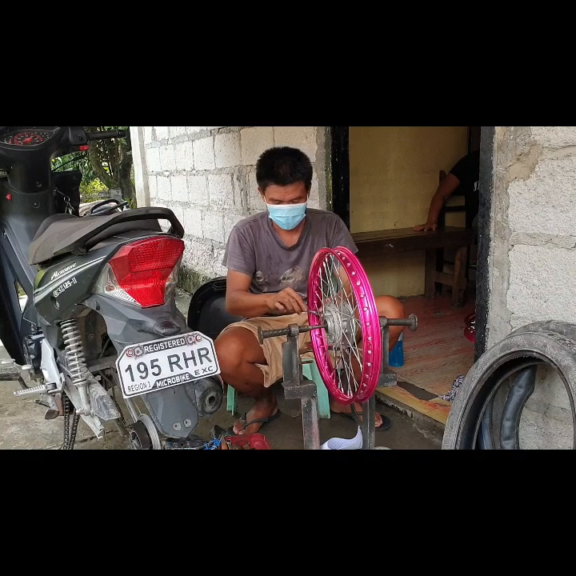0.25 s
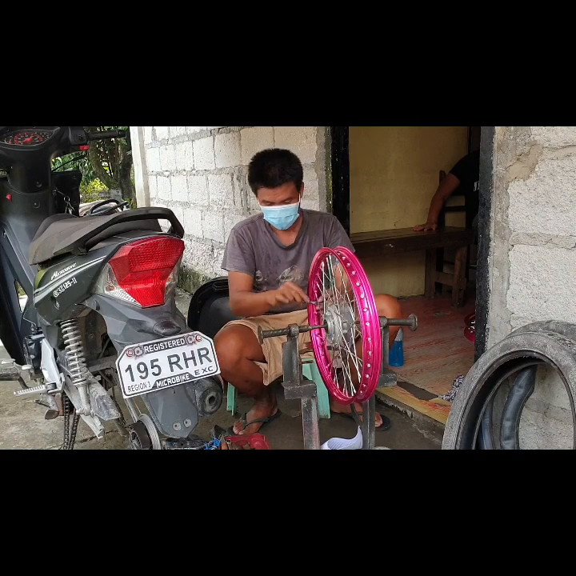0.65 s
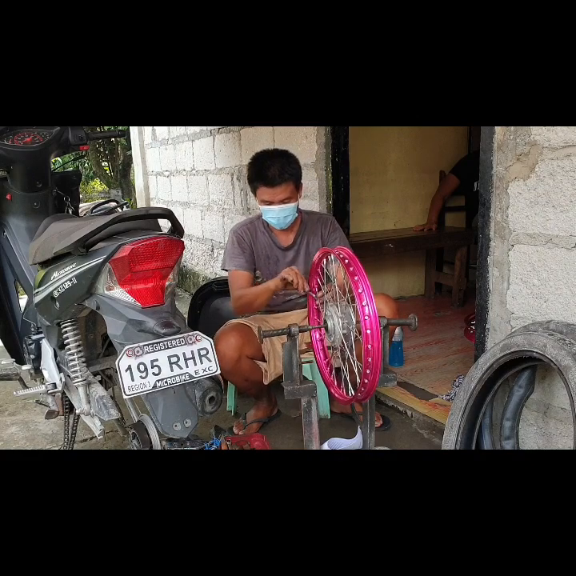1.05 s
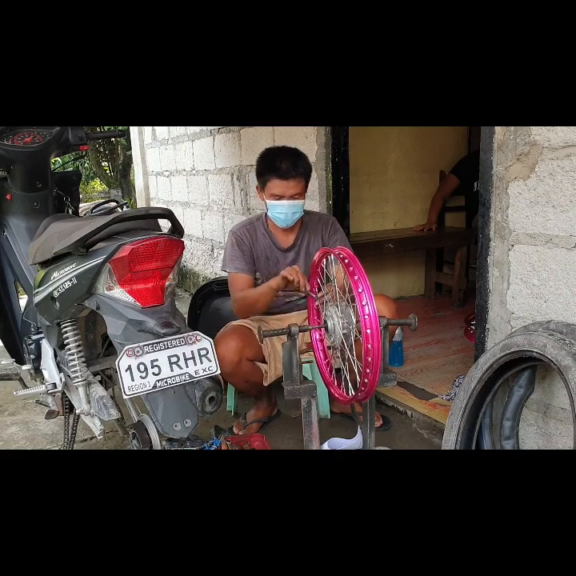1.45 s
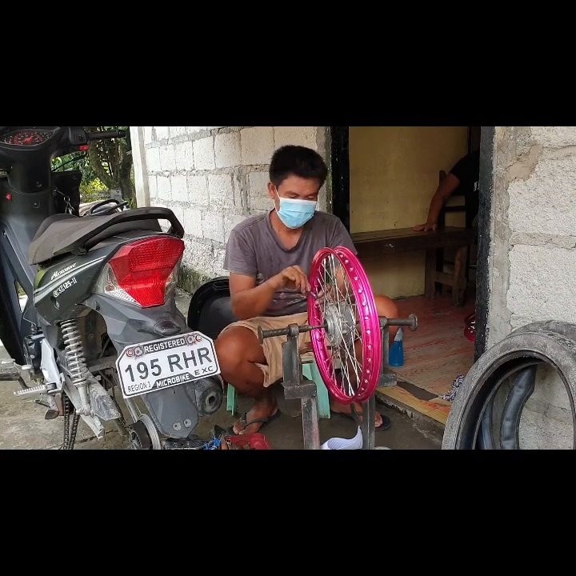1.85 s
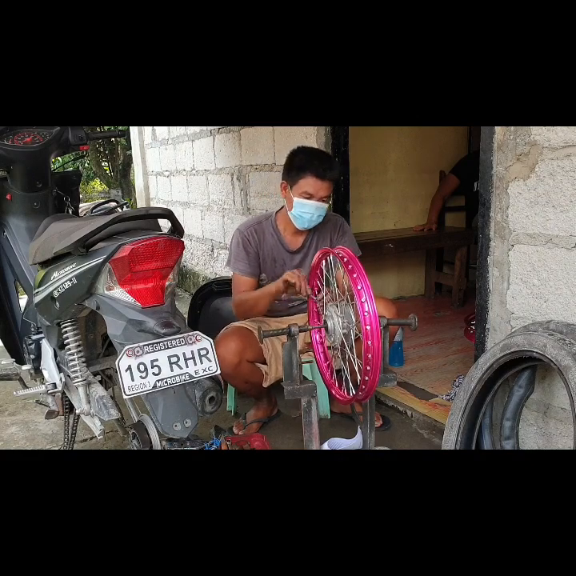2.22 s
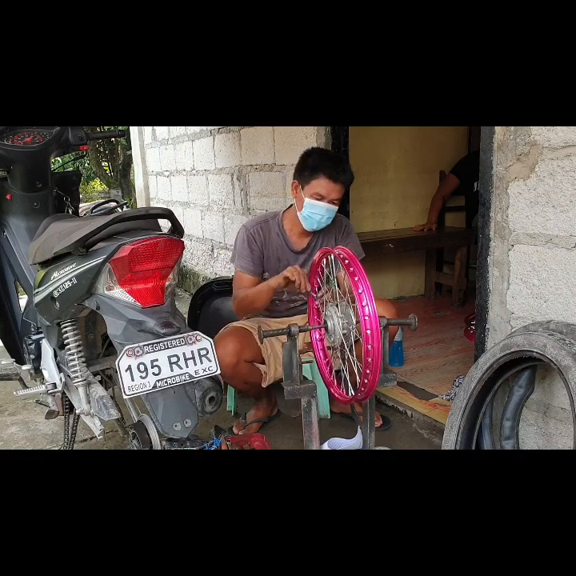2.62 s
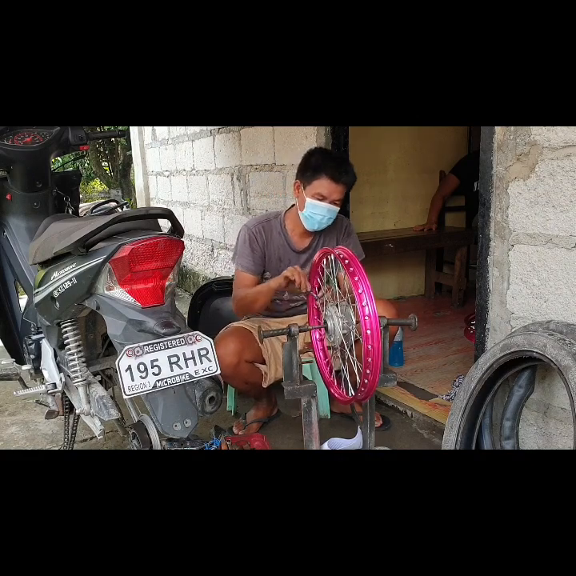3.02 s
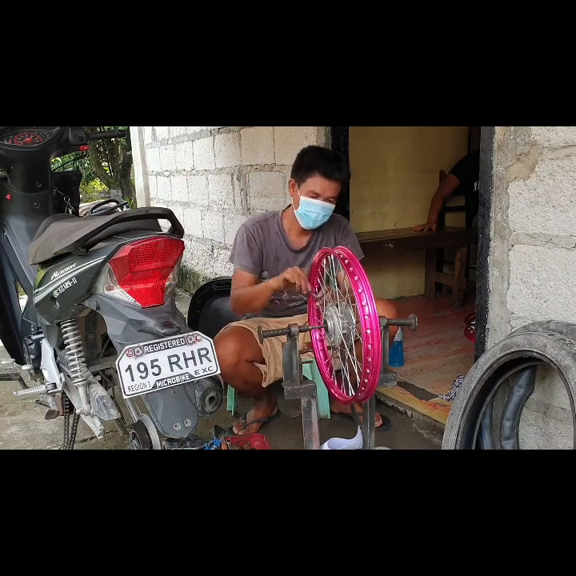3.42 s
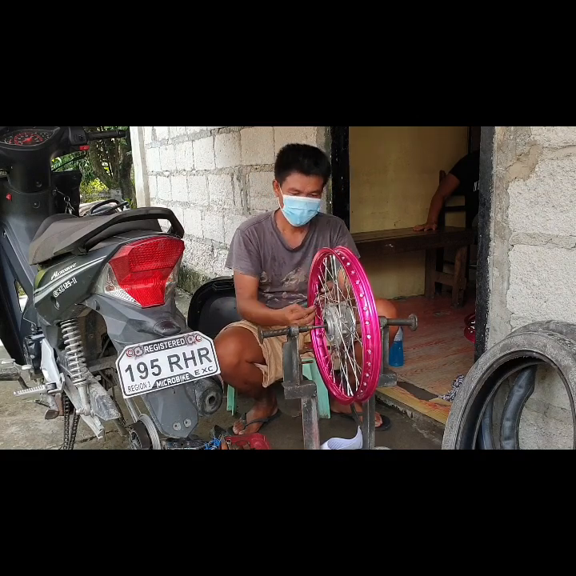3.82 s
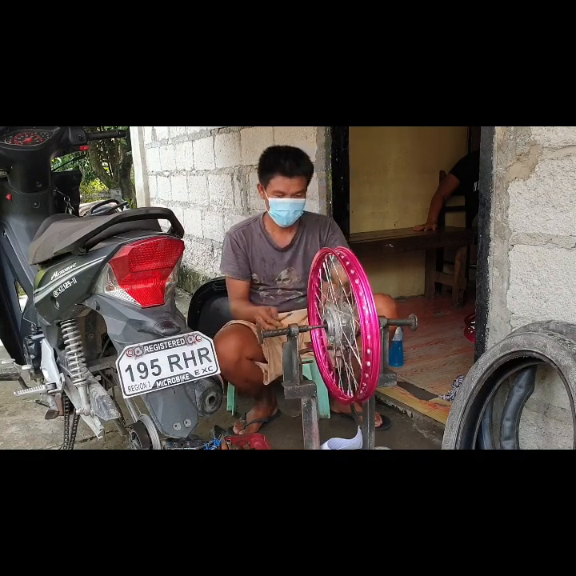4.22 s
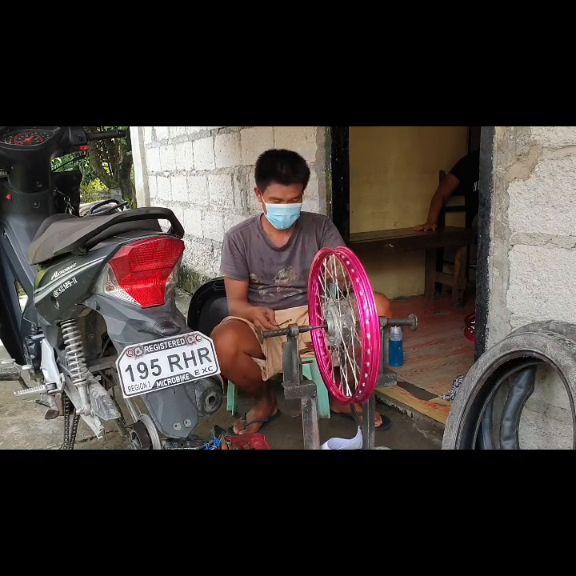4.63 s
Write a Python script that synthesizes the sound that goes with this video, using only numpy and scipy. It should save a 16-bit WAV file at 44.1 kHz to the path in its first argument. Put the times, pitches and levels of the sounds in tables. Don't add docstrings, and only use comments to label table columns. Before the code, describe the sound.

Close by, about two metres away, steel spokes clink, skid and rattle against each other and an alloy rim in irregular bursts, with short bright rings and a brief porch reflection. Behind, a small engine idles low down the road and fades, over soft traffic rumble, light air hiss and far dove coos. The clinks thin out after 3.6 seconds. Wide stereo, clear and natural.

```python
import sys
import numpy as np
from scipy import signal
from scipy.fft import rfft, irfft
from scipy.io import wavfile
from scipy.ndimage import uniform_filter1d, map_coordinates

SR = 44100
rng = np.random.default_rng(int(sys.argv[2]) if len(sys.argv) > 2 else 0)


def undo_db(level):
    steps = np.asarray(level, float) / 20
    return 10 ** steps


def to_wav(s):
    ch = np.atleast_2d(s).T
    pcm = np.round(np.clip(ch, -1, 1) * 32767)
    wavfile.write(sys.argv[1], SR, pcm.astype(np.int16))


N = 214612


def wheel():
    dry = knocks() + skids() + rattles() + pings()
    dry = signal.sosfilt(signal.butter(4, 950, "high", fs=SR, output="sos"), dry[:, :N])
    lag = np.exp(-2j * np.pi * np.fft.rfftfreq(N, 1 / SR) * 6.2e-5)
    dry[0] = irfft(rfft(dry[0]) * lag, N)
    return dry + undo_db(-10) * porch(dry) + slack_spoke()


# t/s, peak level/dB, rim level/dB re peak, loudest rim note f/Hz
KNOCKS = [(0.0954, -26, -37, 1690), (0.2024, -30, -20.5, 1400), (0.425, -12.5, -40, 1605),
          (0.613, -22, -8.5, 1670), (1.422, -18, -18, 1795), (1.542, -23, -12, 1720),
          (1.915, -28.5, -22, 1690), (1.958, -40, -13, 1659), (1.9898, -24, -12.5, 1680),
          (2.3124, -26.5, -17, 1677), (2.3408, -17.5, -3, 1780), (2.3905, -16, -9.5, 1704),
          (2.6378, -23.5, -24, 1700), (2.7235, -15, -6, 1811), (2.7418, -24.5, -1, 1795),
          (2.7825, -20, -2.5, 1784), (3.108, -26, -17, 1740), (3.1296, -13.5, -12.5, 1720),
          (3.1487, -24, 0, 1820), (3.1879, -23.5, -4.5, 1622), (3.2185, -38, -0.5, 1390),
          (3.5316, -26, -7, 1674), (3.5731, -25.5, -1.5, 1675), (3.6005, -15.5, -8.5, 1787),
          (3.6159, -41, 4, 1660)]


def knocks():
    return contacts(KNOCKS, touching_s=0.0082, treble_db=-1)


# t/s, peak level/dB, rim level/dB re peak, loudest rim note f/Hz
SKIDS = [(0.0698, -14, -36, 1460), (0.4789, -20.5, -26, 1690), (1.0186, -29, -29, 1680),
         (1.065, -30, -20, 1710), (1.1206, -26, -7.5, 1690), (1.3724, -38, -31, 1440),
         (1.731, -45.5, -9.5, 1701), (1.8046, -35, -12, 1722), (1.8341, -25.5, -14, 1864),
         (2.2501, -26, -10, 1690), (2.7051, -20.5, -27, 1680), (3.049, -23, -10, 1740),
         (3.4438, -20.5, -9.5, 1660), (3.4745, -20, -18, 1624), (3.5522, -22.5, -1.5, 1880),
         (4.0913, -17.5, -32.5, 1550), (3.434, -40, -21, 1700)]


def skids():
    return contacts(SKIDS, touching_s=0.016, treble_db=-1.1)


# t/s, peak level/dB, rim level/dB re peak, loudest rim note f/Hz
RATTLES = [(0.4031, -24.5, -27, 1620), (0.5576, -34, -15, 1700), (0.7642, -45.5, -14, 1750),
           (0.9643, -37, -15, 1720), (1.091, -28.5, -8.5, 1720), (1.39, -36, -7, 1983),
           (1.5067, -25, -15, 1654), (1.6355, -43, -7, 1680), (1.945, -20, -14.5, 1670),
           (2.218, -31.5, -1, 1914), (2.358, -29.5, 5, 1850), (2.615, -28, -4.5, 1655),
           (2.6393, -22.5, -7, 1732), (3.0191, -28.5, -0.5, 1715), (3.033, -21.5, -11, 1670),
           (4.058, -25.5, -9, 1624), (4.5101, -38.5, -42, 1390)]


def rattles():
    return contacts(RATTLES, touching_s=0.028, treble_db=0.3)


def contacts(rows, touching_s, treble_db):
    dry = np.zeros((2, N + SR))
    for s, db, rim_db, note_hz in rows:
        dulling_db = max(0.4 * (db + 25), 0.36 * (-25 - db))
        wires = shimmer(rim_db, treble_db - 9.5 - dulling_db, touching_s)
        sound = undo_db(db - 12.5) * (wires + undo_db(rim_db + 4) * rim_body(note_hz))
        start = round(s * SR)
        dry[:, start:start + sound.shape[1]] += sound
    return dry


# f/Hz, level/dB
WIRE = [(590, -19), (1000, -25), (1650, -2.5), (1940, -12.5), (2330, -0.5), (4070, -5), (4410, -5),
        (5070, -7), (6110, -3.5), (7440, -8.5), (10800, -2), (14800, -7), (16000, -18)]
# f/Hz, t60/s
WIRE_T60 = [(1000, 0.24), (3000, 0.24), (7000, 0.15), (15000, 0.1)]


def shimmer(rim_db, top_db, touching_s):
    size = SR // 3
    spikes_db = np.minimum(5 * unit(uniform_filter1d(rng.standard_normal(size // 2 + 1), size=20)), 8)
    offset = (np.fft.rfftfreq(size, 1 / SR) - np.transpose(RIM)[0][:, None]) / 35
    spikes = undo_db(spikes_db + 2.14 * np.exp(-offset ** 2).max(axis=0))
    noise = unit(irfft(rfft(rng.standard_normal((3, size))) * spikes, size))
    hz, t, z = signal.stft(noise, SR, nperseg=128)
    tilt = [0.46 * (rim_db + 18), 0, top_db + 9.5]
    tilt_db = np.interp(np.log(hz + 1), np.log([2000, 5000, 10000]), tilt)
    wire_db = along(WIRE, hz)
    colour = undo_db(wire_db + tilt_db) / np.sqrt(np.mean(undo_db(2 * wire_db)))
    touches = undo_db(6 * uniform_filter1d(rng.standard_normal(len(t)), size=3) * np.exp(-t / 0.05))
    touches = touches * (1 + 0.5 * np.exp(-t / 0.0014))
    decay = undo_db(-60 * np.maximum(t - touching_s, 0) / along(WIRE_T60, hz)[:, None])
    sound = signal.istft(z * colour[:, None] * decay * touches, SR, nperseg=128)[1][:, :size]
    onset = 1 - np.exp(-np.arange(size) / SR / 0.00052)
    return (0.46 * sound[0] + 0.85 * sound[1:]) * onset


# f/Hz, level/dB, t60/s
RIM = [(1132, -8, 5.0), (1496, -4, 0.66), (1390, -4.5, 0.63), (1690, -6, 0.098), (2256, -4.5, 0.31),
       (2417, -36, 0.14), (2720, -10, 0.71), (3070, -45.5, 0.1), (3650, -40, 0.6), (3510, 2.5, 0.15),
       (3850, -18, 0.19), (3640, -4, 0.24), (3750, -49, 0.3), (4270, -1, 0.15), (4290, -24, 0.45),
       (4500, -39, 0.45), (5350, -12, 0.12), (6200, -14, 0.071), (5390, -32.5, 0.099), (6840, -10, 0.08)]


def rim_body(note_hz):
    t = np.arange(SR // 3) / SR
    hz, db, t60 = np.transpose(RIM)
    modes = ringing(hz * rng.normal(1, 0.00434, len(hz)), np.clip(t60, 0.06, 0.3), t)
    strength = undo_db(db + 3.5 * rng.standard_normal(len(hz))) * rng.normal(1, 0.067, (2, len(hz)))
    note = ringing(np.array([note_hz]), np.array([0.14]), t) * undo_db([[-1.5], [1.5]])
    return 0.32 * strength @ modes + 1.47 * note


# t/s, f/Hz, level/dB
PINGS = [(0.0712, 3600, -37), (0.4803, 3090, -38), (0.614, 2305, -43), (1.0919, 2130, -40),
         (1.0919, 4260, -40), (1.4217, 3500, -43), (1.541, 2616, -38), (1.8347, 2700, -42),
         (1.943, 2663, -37), (2.2194, 2710, -41.5), (2.2504, 3672, -35.5), (2.3416, 4300, -42),
         (2.3915, 2268, -45), (2.637, 2376, -37), (2.6384, 3530, -32), (2.7228, 4335, -23.5),
         (2.7836, 2300, -28), (2.7836, 3360, -39), (3.13, 2890, -34), (3.1298, 4430, -21.5),
         (3.2187, 2390, -37), (3.4435, 2295, -37), (3.4455, 3360, -34), (3.5528, 2290, -40),
         (3.5528, 4340, -32.5), (3.6007, 2300, -29), (3.6004, 3380, -28.5), (4.058, 2740, -44),
         (4.091, 2920, -38), (4.09, 5430, -26.5)]
# f/Hz, t60/s
PING_T60 = [(2300, 0.23), (2800, 0.28), (3400, 0.15), (5500, 0.11)]


def pings():
    dry, t = np.zeros((2, N + SR)), np.arange(SR // 3) / SR
    for s, hz, db in PINGS:
        note = ringing(np.array([hz]), along(PING_T60, np.array([hz])), t)
        start = round(s * SR)
        dry[:, start:start + len(t)] += undo_db(db - 3) * rng.normal(1, 0.13, (2, 1)) @ note
    return dry


def ringing(hz, t60, t):
    drift = np.cumsum(rng.standard_normal((len(hz), len(t))), axis=1) * 0.011
    sines = np.sin(2 * np.pi * hz[:, None] * t + drift)
    return sines * undo_db(-60 * t / t60[:, None]) * (1 - np.exp(-t / 0.0002))


# t/s, f/Hz, level/dB
SLACK = [
    (4.1, 1540, -46),
    (4.2, 1535, -59.5),
    (4.33, 1527, -70.5),
    (4.4, 1390, -72),
    (4.47, 1405, -65),
    (4.56, 1360, -64),
]


def slack_spoke():
    return faint_tone(SLACK, rough=1.3, pan_db=1.0)


# f/Hz, t60/s
PORCH = [(500, 0.26), (2000, 0.29), (6000, 0.26), (15000, 0.25)]


def wall_answer(x):
    hz, t, z = signal.stft(rng.standard_normal((2, SR // 2)), SR, nperseg=256)
    tail = signal.istft(z * undo_db(-60 * t / along(PORCH, hz)[:, None]), SR, nperseg=256)[1]
    tail = np.pad(tail, ((0, 0), (round(0.004 * SR), 0)))
    return signal.fftconvolve(x, tail / np.linalg.norm(tail[0]), axes=1)


def porch(dry):
    size = SR // 4
    wet = np.zeros((2, N + SR))
    for start in range(0, N, size):
        answer = wall_answer(dry[:, start:start + size])
        wet[:, start:start + answer.shape[1]] += answer
    return wet[:, :N]


# t/s, firing f/Hz, level/dB, centre f/Hz of the street's boom
ENGINE = [(0, 24.64, -47.5, 149), (.2, 23.47, -44, 153), (.45, 24.36, -41.5, 148), (.7, 24.13, -41.5, 147),
          (.95, 24.28, -39.5, 138), (1.2, 24.3, -42, 132), (1.45, 24.4, -44, 128.9),
          (1.62, 24.31, -54.5, 126), (1.78, 24.4, -48, 122.9), (2.0, 24.4, -44, 133),
          (2.25, 24.18, -41.5, 137), (2.5, 24.51, -48, 150), (2.75, 24.45, -54, 147),
          (2.9, 24.33, -54, 124), (3.2, 24.44, -59.5, 148), (3.42, 24.85, -49, 148),
          (3.7, 25.13, -57.5, 152), (4.1, 25.2, -60, 152)]
# order, heard through the boom 1 or directly 0, level/dB
ORDER = [(3, 1, -5), (4, 1, 5), (5, 1, 1.5), (6, 1, -1), (7, 1, -1), (8, 1, -1.5), (9, 0, -15), (10, 0, -3),
         (11, 0, 0.5), (12, 0, 0), (13, 0, -30), (14, 0, -3)]


def engine():
    hz, level_db, boom_hz = curves(ENGINE)
    s = np.arange(N) / SR
    turn = 2 * np.pi * np.cumsum(hz) / SR
    firing_hz, boom_width_hz, off_boom_db = 23.97, 24.5, -20
    total = np.zeros(N)
    for order, through_boom, db in ORDER:
        if through_boom > 0.5:
            offset = (order * firing_hz - boom_hz) / boom_width_hz
            course_db = level_db + np.maximum(-6 * offset ** 2, off_boom_db)
        else:
            course_db = -56 - 3 * s + 2.0 * wobble(3.44)
        gain = undo_db(course_db + db + 1.45 * wobble(3.51))
        total += gain * np.sin(round(order) * turn + 0.5 * order * order + 0.2 * wobble(3))
    fade = np.clip((ENGINE[-1][0] - s) / 0.37, 0, 1)
    return np.sqrt(2) * fade * total * undo_db([[0.2], [-0.2]])


# t/s, rumble level/dB
TRAFFIC = [(0, -45), (.5, -43), (1.1, -43), (1.3, -49), (2.4, -57), (3.5, -49.5), (3.7, -55.5),
           (3.95, -53.5), (4.02, -48.5), (4.19, -51), (4.3, -49.5), (4.65, -48.5), (4.76, -49), (4.87, -50)]
# f/Hz, level/dB
RUMBLE = [(13, -66), (22, -28), (32, -20), (49, -6.5), (69, 2), (238, -12), (269, -18), (300, -26),
          (390, -41), (660, -120)]
# f/Hz, level/dB
HUM = [(88, -36), (150, -1.5), (237, -2), (268, -2), (308, -1), (368, -3.5), (1400, -24.5), (1820, -23),
       (3080, -120)]


def road():
    s = np.arange(N) / SR
    traffic_db, = curves(TRAFFIC)
    rumble = undo_db(traffic_db + 2.5) * rush(RUMBLE, patchy_db=0.75)
    hum_db = -50 - 1.56 * s + 0.19 * (traffic_db - traffic_db.mean())
    hum_db = hum_db + 5 * np.exp(-((s - 4.6) / 0.24) ** 2)
    hum = undo_db(hum_db + 1.1 * wobble(7.19)) * rush(HUM, patchy_db=3.5)
    return rumble + hum


# start t/s, length t/s, f/Hz, level/dB
DOVES = [
    (0.964, 0.23, 738, -62.5),
    (1.406, .19, 571, -61),
    (2.494, 0.26, 730, -64),
    (2.55, .16, 570, -62),
    (3.203, 0.38, 544, -55.5),
]


def doves():
    return sum(faint_tone(swell(*row, sag=0.035), rough=0.59, pan_db=1.0) for row in DOVES)


# start t/s, length t/s, f/Hz, level/dB
CHIRPS = [
    (4.69, .19, 3700, -64.5),
    (4.69, .14, 4500, -69),
    (4.83, .08, 2896, -71.5),
]


def chirps():
    return sum(faint_tone(swell(*row, sag=0.45), rough=2.1, pan_db=0.7) for row in CHIRPS)


def swell(s, length, hz, db, sag):
    shape = ((0, 3), (0.64, 0), (1, 13))  # (share of the note, dB below its peak)
    return [(s + u * length, hz * (1 - sag * u * length), db - below) for u, below in shape]


def faint_tone(rows, rough, pan_db):
    hz, db = curves(rows)
    s = np.arange(N) / SR
    gate = np.clip(np.minimum(s - rows[0][0], rows[-1][0] - s) / 0.019, 0, 1)
    smear = rough * np.array([wobble(120), wobble(120)])
    tone = np.sin(2 * np.pi * np.cumsum(hz) / SR + smear)
    return np.sqrt(2) * gate * undo_db(db + 0.73 * wobble(28.0)) * tone * undo_db([[pan_db], [-pan_db]])


# t/s, level/dB
BREEZE = [
    (0, -58),
    (.35, -54.5),
    (.9, -61),
    (2.17, -63),
    (2.98, -63),
    (3.38, -60),
    (4.0, -66),
    (4.35, -67),
    (4.87, -64.5),
]
# f/Hz, level/dB
AIR = [(530, -19), (900, -0.5), (1410, -4.5), (1550, -3), (2690, -0.5), (3470, -7), (4980, -5.5),
       (10000, -20.5), (13800, -13.5), (16000, -26.5)]


def breeze():
    return undo_db(curves(BREEZE)[0]) * rush(AIR, patchy_db=1.1)


# f/Hz, likeness 0..1
ALIKE = [(60, 0.96), (150, 0.88), (300, 0.37), (600, 0.45), (1500, 0.022), (8000, 0.044)]


def rush(spectrum, patchy_db):
    z = signal.stft(rng.standard_normal((2, N + 1024)), nperseg=512)[2]
    field = uniform_filter1d(rng.standard_normal(z.shape[1:]), size=6, axis=0)
    field = uniform_filter1d(field, size=14, axis=1)
    pair = signal.istft(z * undo_db(patchy_db * unit(field)), nperseg=512)[1][:, :N]
    hz = np.fft.rfftfreq(N, 1 / SR)
    turn = np.arccos(np.clip(along(ALIKE, hz), -1, 1)) / 2
    mid, side = irfft(rfft(pair) * undo_db(along(spectrum, hz)) * [np.cos(turn), np.sin(turn)], N)
    return unit(np.array([mid + side, mid - side]))


def unit(x):
    return x / np.sqrt(np.mean(x ** 2) + 1e-20)


def along(points, hz):
    f, v = np.transpose(points)
    return np.interp(np.log(hz + 1), np.log(f + 1), v)


def curves(rows):
    s, *cols = np.transpose(rows)
    return [np.interp(np.arange(N) / SR, s, c) for c in cols]


def wobble(rate):
    return map_coordinates(rng.standard_normal(int(N * rate / SR) + 4), [np.arange(N) * rate / SR])


def scene():
    return wheel() + engine() + road() + doves() + chirps() + breeze()


def low_pass(x):
    return signal.sosfilt(signal.butter(12, 16500, fs=SR, output="sos"), x)


def record(dry):
    edge = np.clip((16250 - np.fft.rfftfreq(N, 1 / SR)) / 900, 0, 1) ** 2
    mix = irfft(rfft(dry) * edge, N)
    return low_pass(mix)


dry = scene()
out = record(dry)
to_wav(out)
```